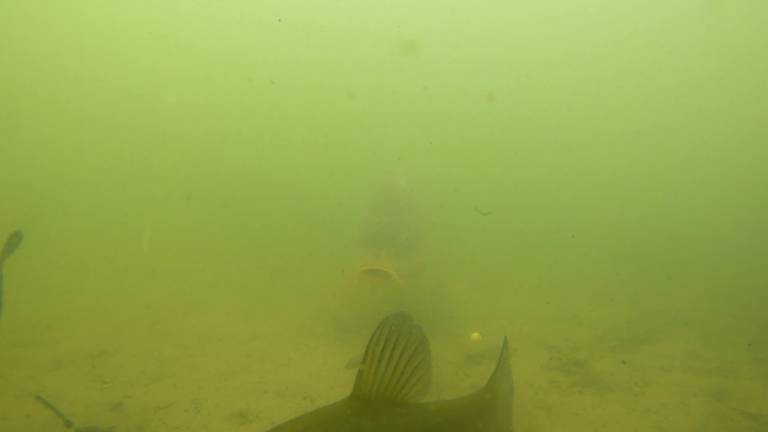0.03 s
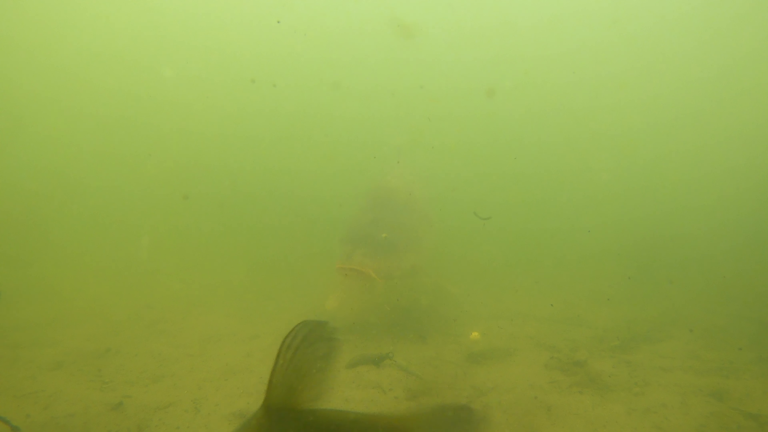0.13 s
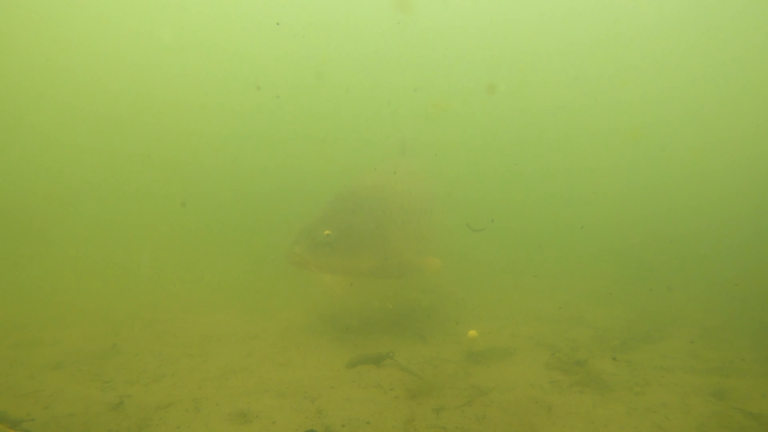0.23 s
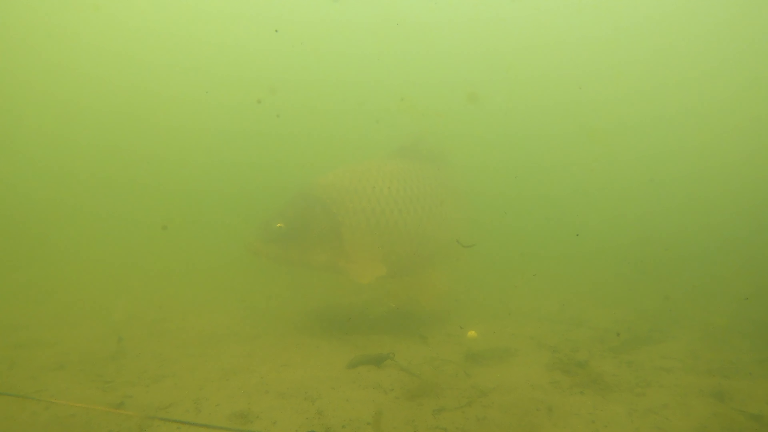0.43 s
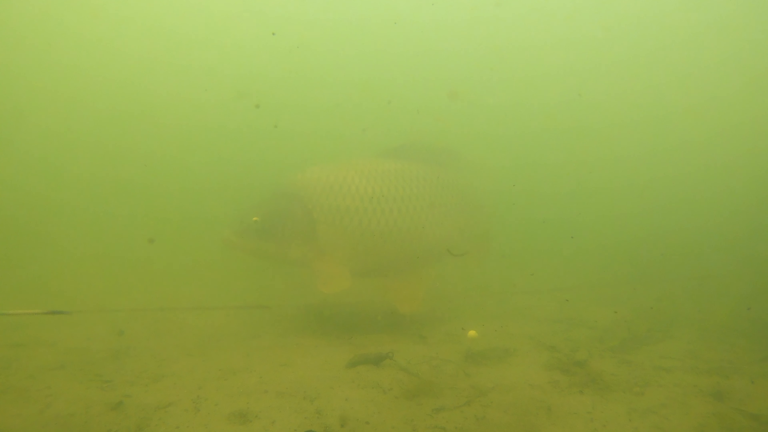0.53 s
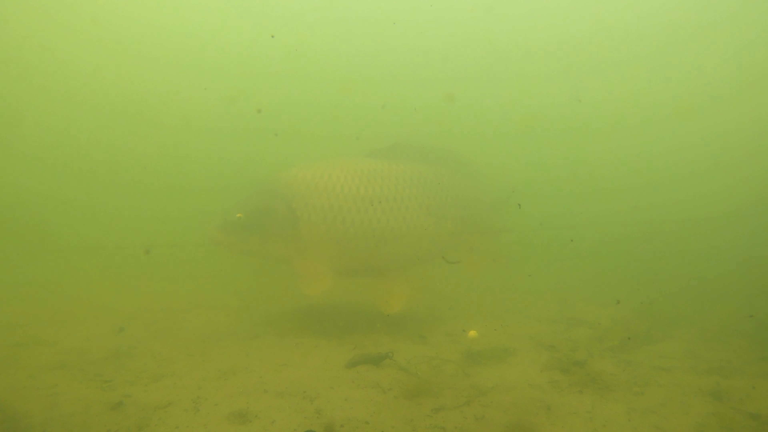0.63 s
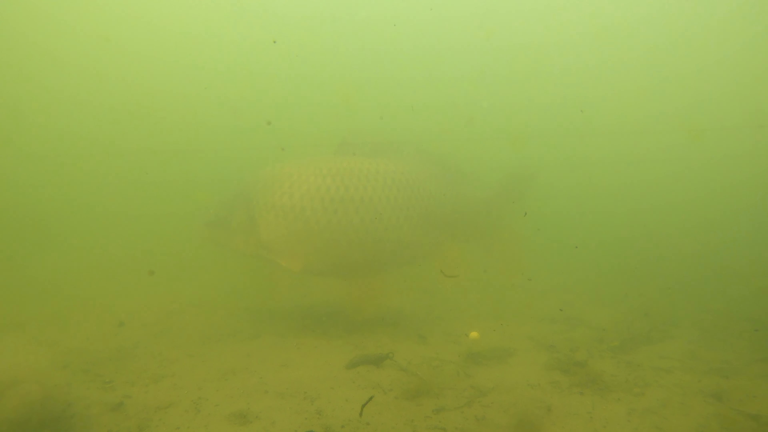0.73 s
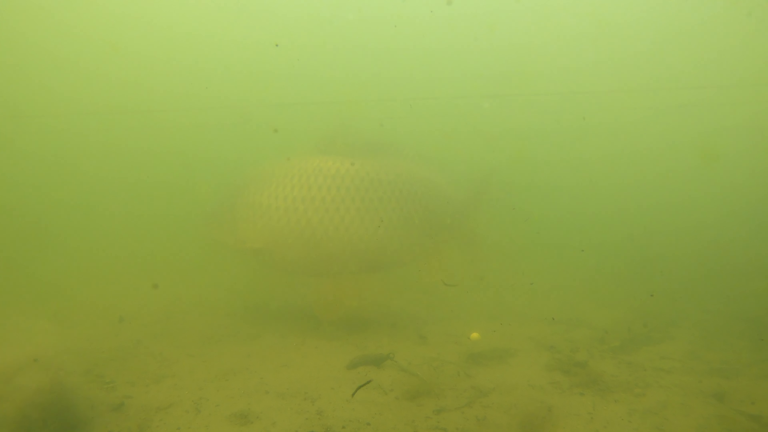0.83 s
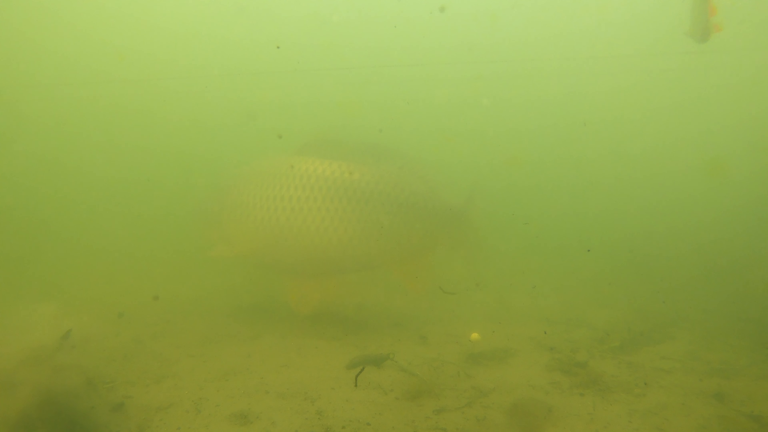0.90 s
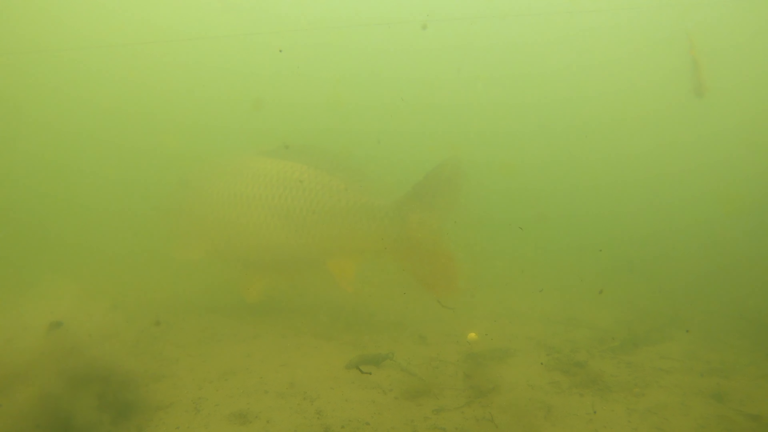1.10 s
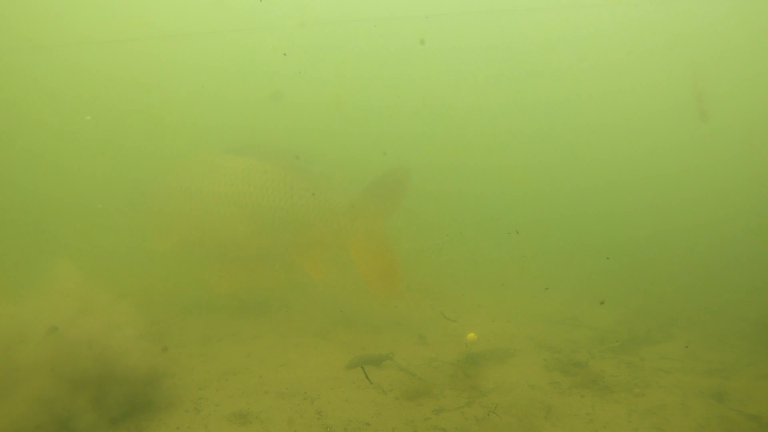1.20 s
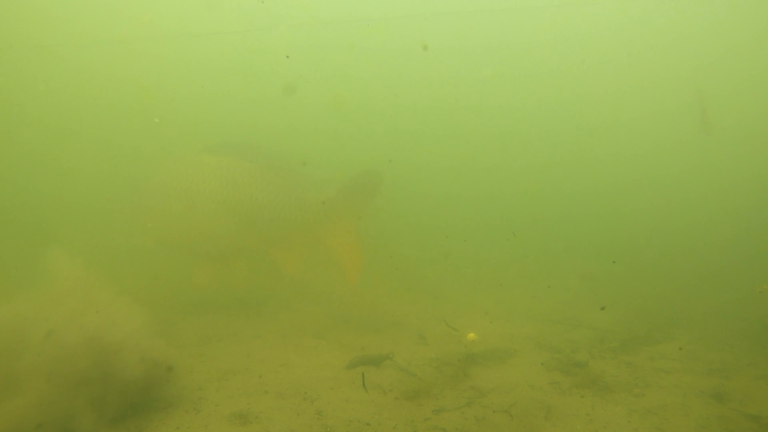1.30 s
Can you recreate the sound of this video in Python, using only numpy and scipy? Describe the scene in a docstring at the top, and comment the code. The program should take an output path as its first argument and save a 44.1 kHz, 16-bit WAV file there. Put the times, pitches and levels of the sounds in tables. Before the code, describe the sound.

A fish bumps an underwater camera, very close. From about 0.1 seconds, rubbing and soft knocks build over a low water rumble, peaking in one loud bump near 0.3 seconds that shakes the mount. A clicking scrape fades by 0.6 seconds. Faint silt ticks and a few small bubbles follow until about 1.3 seconds. A low electric hum runs underneath, dipping at the bump and creeping back.

```python
"""Rubbing, soft knocks, one loud bump and a fading scrape, over a low electric hum from the mains.
A fish is brushing past an underwater camera on a pond bed. Each touch makes the camera's case ring,
the water rumbles as it is pushed about, and the bump shakes the mount. Silt ticks on the case and
a few small bubbles ring. The bump makes the automatic volume control turn everything down,
and then the hum creeps back."""
import sys
import numpy as np
from scipy import signal
from scipy.fft import rfft, irfft, next_fast_len
from scipy.io import wavfile
from scipy.ndimage import uniform_filter1d, minimum_filter1d, map_coordinates

SR = 44100
rng = np.random.default_rng(int(sys.argv[2]) if len(sys.argv) > 2 else 0)


def to_wav(s):
    """Save 16-bit WAV."""
    ch = np.atleast_2d(s).T  # columns
    pcm = np.round(np.clip(ch, -1, 1) * 32767)  # PCM
    wavfile.write(sys.argv[1], SR, pcm.astype(np.int16))


N = 59535
TIME = np.arange(N) / SR
FFT_SIZE = next_fast_len(N + SR // 2)
SIDE = np.array([[1], [-1]])  # left, right


def amp(db):
    """Turn decibels into a multiplier."""
    return 10 ** (np.asarray(db) / 20)


def unit(x):
    """Scale a sound to an average power of 1."""
    return x / np.sqrt(np.mean(x ** 2) + 1e-20)


def along(points, hz):
    """Read a curve of (f/Hz, value) points on a log frequency axis."""
    f, value = np.transpose(points)
    return np.interp(np.log(hz + 1), np.log(f + 1), value)


def level(points):
    """Turn (t/s, level/dB) points into one multiplier per sample."""
    return amp(np.interp(TIME, *np.transpose(points)))


def filtered(x, response):
    """Multiply each frequency f in a sound by response(f)."""
    f = np.fft.rfftfreq(FFT_SIZE, 1 / SR)
    return irfft(rfft(x, FFT_SIZE) * response(f), FFT_SIZE)[..., :N]


def resonance(f, hz, width):
    """The response of something that rings at hz, with a peak of 1."""
    return 1j * f * width / (hz * hz - f * f + 1j * f * width)


def lowpass(f, hz, order):
    """A response that fades above hz, more steeply at a higher order."""
    b, a = signal.butter(order, 1, analog=True)
    return np.polyval(b, 1j * f / hz) / np.polyval(a, 1j * f / hz)


def case_response(contact):
    """The case rings briefly at several pitches; the kind of touch sets their mix."""
    # rings of the case: f/Hz, width/Hz, then level/dB for soft, scrape, hard and silt touches
    rings = [(613.7, 180, 9, -4, -4.5, -21), (761, 170, -1.5, -6.5, 11, -5.5),
             (1584, 233, -6.5, 5.5, 18, 5.5), (1808, 330, -44, -1.5, -12.5, -8),
             (2556, 270, -35, -4, 5.5, -5), (3070, 360, -36.5, -4, 1, -22),
             (4050, 580, -43.5, -18, -9.5, -21), (6040, 550, -59.5, -15.5, -17.5, -38),
             (8850, 1800, -59.5, -22.5, -14, -28)]
    # gaps between the rings: f/Hz, width/Hz, level/dB (the first is a small lift)
    gaps = [(334, 310, 3), (1280, 700, -15), (2137, 400, -17.5), (5035, 700, -9.5)]
    column = ["soft", "scrape", "hard", "silt"].index(contact)
    f = np.fft.rfftfreq(FFT_SIZE, 1 / SR)
    response = sum(amp(db[column]) * resonance(f, hz, width) ** 2 for hz, width, *db in rings)
    for hz, width, db in gaps:
        response *= 1 - (1 - amp(db)) * resonance(f, hz, width)
    return response


def blow(s, db, response, rattle):
    """One hit at time s chatters as it settles, differently in each microphone."""
    rattle_s = 0.0032
    start = round(s * SR)
    t = (np.arange(N) - start) / SR
    settling = (t >= 0) * np.exp(-np.abs(t) / rattle_s) / np.sqrt(rattle_s * SR / 2)
    chatter = rng.standard_normal((2, N)) * settling
    ring = filtered(signal.unit_impulse(N, start) + rattle * chatter, response)
    return amp(db) * ring / np.abs(ring).max(axis=1).mean()


def friction(contact, slips_per_s, stereo_width):
    """A surface catches and lets go, so clumps of tiny, uneven slips ring the case."""
    spread_db, clump_db, catches_per_s = 4, 3.5, 110
    slips = (rng.random((3, N)) < slips_per_s / SR) * rng.choice([-1, 1], (3, N))
    slips = slips * amp(spread_db * rng.standard_normal((3, N)))
    grip = map_coordinates(rng.uniform(-0.93, 1, N), [TIME * catches_per_s], mode="mirror")
    stereo = slips[0] + stereo_width * slips[1:]  # rows: shared, left, right
    return unit(filtered(amp(clump_db * grip) * stereo, lambda f: case_response(contact)))


def hum_and_noise():
    """Mains electricity hums steadily, a little to the left, over faint noise."""
    # tones of the hum: multiple of the mains frequency, level/dB
    tones = [(1, -36), (2, -67), (3, -45), (4, -71), (5, -65), (7, -68), (9, -75.5)]
    # tone colour of the noise: f/Hz, level/dB
    colour = [(20, -3), (90, 7), (200, -14.5), (400, -28.5), (1200, -21.5), (3500, -23), (5200, -37),
              (9000, -36.5), (12000, -41.5), (15000, -64.5)]
    mains_hz, pan_db, noise_db = 50, 2.5, -56
    hum = sum(amp(db) * np.sin(2 * np.pi * (k * mains_hz * TIME + rng.random())) for k, db in tones)
    noise = rng.standard_normal(N) + 0.84 * rng.standard_normal((2, N))
    noise = unit(filtered(noise, lambda f: amp(along(colour, f))))
    return hum * amp(pan_db * SIDE) + amp(noise_db) * noise


def ticks():
    """Fin rays and grit click on the case; the spot each one hits favours one ring."""
    # hard hits: t/s, level/dB, brightness/(dB per octave), ring f/Hz, ring level/dB
    hits = [(0.057, -36.5, 13, 8930, -38.5), (0.0571, -34.5, -2, 1835, -37.5),
            (0.109, -40.5, -6, 3200, -48.5), (0.146, -44, 4.5, 6360, -52), (0.2335, -49, 8.5, 6500, -45.5),
            (0.262, -21, 1, 4233, -37.5), (0.2625, -21.5, -8, 3080, -23), (0.2783, -17.5, -3, 981, -9),
            (0.3305, -26.5, -9.5, 1180, -34.5), (0.365, -33, -3, 1750, -34),
            (0.375, -26.5, 1.5, 1710, -28.5), (0.421, -28.5, 1, 6280, -23),
            (0.462, -28.5, -5.5, 1830, -34.5), (0.510, -37.5, 6, 8420, -58),
            (0.683, -32.5, -6.5, 4880, -53), (0.705, -40, -2, 4590, -47.5),
            (0.766, -52.5, -14, 1286, -46.5), (1.046, -43.5, 4, 2400, -44.5)]
    ring_sharpness = 4.5
    hard = case_response("hard")
    out = np.zeros((2, N))
    for s, db, bright, hz, ring_db in hits:
        out += blow(s, db, lambda f: hard * amp(bright * np.log2(np.clip(f, 500, 9000))), rattle=0.77)
        out += blow(s, ring_db, lambda f: resonance(f, hz, hz / ring_sharpness) ** 2, rattle=0.4)
    return out


def rubbing():
    """The fish's soft side slides along the case."""
    # strength of the rub: t/s, level/dB
    strength = [(0, -64), (.105, -78), (.128, -57.5), (.138, -46), (.166, -34), (.177, -58), (.195, -36.5),
                (.25, -39), (.284, -19.5), (.305, -26.5), (.34, -32.5), (.37, -48), (.51, -44.5),
                (.55, -52.5), (.58, -78)]
    return level(strength) * friction("soft", slips_per_s=2200, stereo_width=0.051)


def churn():
    """Water rumbles as the fish pushes it about."""
    # tone colour of the rumble: f/Hz, level/dB
    colour = [(20, -1), (45, 0), (130, -5.5), (200, -10.5), (300, -16), (400, -22.5), (700, -41),
              (3000, -89.5)]
    # surges of water: t/s, level/dB
    surges = [(.11, -83), (.145, -31), (.18, -44), (.235, -24.5), (.3, -34.5), (.345, -26), (.39, -49.5),
              (.47, -37.5), (.52, -43), (.59, -66.5), (.67, -55), (.98, -69.5), (1.05, -54), (1.11, -67)]
    return level(surges) * unit(filtered(rng.standard_normal(N), lambda f: amp(along(colour, f))))


def shudders():
    """The camera rocks on its mount in short, low bursts."""
    # shakes of the mount: t/s, length/s, f/Hz, level/dB
    shakes = [(0.131, 0.045, 105, -36.5), (0.226, 0.04, 64, -24.5), (0.2765, 0.041, 96.2, 7.5),
              (0.28, 0.069, 45.8, -8), (0.311, 0.071, 134, -10.5), (0.316, 0.12, 86.3, -13),
              (0.327, 0.068, 43.3, -7.5), (0.385, 0.1, 144, -27.5), (0.409, 0.067, 44.6, -9),
              (0.492, 0.055, 41.9, -21), (0.549, 0.063, 36.2, -32.5)]
    fade_share = 0.62  # part of each burst spent rising and falling
    out = np.zeros(N)
    for s, length, hz, db in shakes:
        t = TIME - s
        fade = np.clip(np.minimum(t, length - t) / (length * fade_share / 2), 0, 1)
        out += amp(db) * np.sin(np.pi / 2 * fade) ** 2 * np.sin(2 * np.pi * hz * t)
    return out


def knocks():
    """The fish nudges the case; its soft body stirs up little treble."""
    # soft hits: t/s, level/dB
    hits = [(0.134, -22.5), (0.1555, -30.5), (0.193, -25.5), (0.2167, -17), (0.2415, -18.5), (0.2667, -23),
            (0.2744, -9.5), (0.330, -23.5), (0.850, -53)]
    soft = case_response("soft")
    return sum(blow(s, db, lambda f: soft * lowpass(f, hz=2500, order=2), rattle=0.67) for s, db in hits)


def scraping():
    """A fin scrapes over the case, brighter than the rub."""
    # strength of the scrape: t/s, level/dB
    strength = [(0, -69.5), (.09, -69), (.2, -69), (.27, -46), (.3, -51.5), (.355, -47), (.376, -29.5),
                (.402, -35.5), (.411, -39), (.424, -35.5), (.465, -40), (.52, -48.5), (.56, -70),
                (.62, -106)]
    return level(strength) * friction("scrape", slips_per_s=2200, stereo_width=0.34)


def bubbles():
    """Each small bubble rings briefly at one pitch, with a soft start."""
    # bubble notes: t/s, f/Hz, level/dB
    notes = [(0.2593, 2849, -34), (0.379, 1598, -26.5), (0.397, 1654, -23.5), (0.694, 602, -46.5),
             (0.746, 767, -49), (0.760, 1600, -39.5), (0.772, 826, -49), (1.010, 785, -44.5),
             (1.045, 1488, -38), (1.052, 2430, -41), (1.228, 1545, -42), (1.25, 1610, -39.5),
             (1.252, 2630, -37), (1.265, 1753, -42.5), (1.264, 3400, -54.5)]
    rise_s = 0.00256
    out = np.zeros(N)
    for s, hz, db in notes:
        t = np.maximum(TIME - s, 0)
        swell = t / rise_s * np.exp(1 - t / rise_s)
        out += amp(db) * swell * np.sin(2 * np.pi * hz * t)
    return out


def bump():
    """The fish's side presses in: the case's lowest ring swells, then the body damps it."""
    peak_s, press_s, release_s = 0.2793, 0.0014, 0.0016
    ring_hz, level_db = 608.4, 10.5
    pan_db, left_lead_rad = 1.65, 0.58  # it lands near the middle
    t = TIME - peak_s
    pressure = np.where(t < 0, np.exp(-(t / press_s) ** 2 / 2), np.exp(-np.abs(t) / release_s))
    ring = np.cos(2 * np.pi * ring_hz * t + SIDE * left_lead_rad / 2)
    return amp(level_db + pan_db * SIDE) * pressure * ring


def silt():
    """Fine grains of drifting mud tick on the case."""
    # strength of the drift: t/s, level/dB
    strength = [(.55, -67.5), (.675, -63), (.69, -48.5), (.735, -64.5), (.77, -57), (.795, -59), (.97, -59),
                (1.02, -52), (1.055, -43.5), (1.09, -58), (1.15, -55.5), (1.21, -60), (1.27, -59),
                (1.32, -72)]
    return level(strength) * friction("silt", slips_per_s=1000, stereo_width=0.18)


def through_case(f):
    """The case passes little treble and reaches its two microphones slightly differently."""
    # how much louder the left is: f/Hz, level/dB
    balance = [(300, 6), (600, -2.5), (900, -7), (1600, -5.5), (3000, -2), (6000, -1), (10000, -2)]
    # how far the left wave runs ahead: f/Hz, phase/rad
    lead = [(200, -1.43), (600, -0.5), (1000, 2.2), (1600, 1.3), (3000, 1.35), (6000, 2.1), (10000, 0.76)]
    left_over_right = amp(along(balance, f)) * np.exp(1j * along(lead, f))
    return left_over_right ** (SIDE / 2) * lowpass(f, hz=9800, order=4)


def scene():
    """Add all the sounds into a left and a right channel."""
    small_sounds = rubbing() + scraping() + silt() + knocks() + ticks() + bubbles()
    return filtered(small_sounds, through_case) + bump() + shudders() + churn() + hum_and_noise()


def record(dry):
    """The volume drops just before a loud peak and creeps back; the highest treble is cut."""
    ceiling, recover_db_per_s, look_s, top_hz = 0.92, 7.5, 0.003, 15700
    window = round(look_s * SR)
    needed_db = -20 * np.log10(np.maximum(np.abs(dry).max(axis=0) / ceiling, 1))
    climb_db = recover_db_per_s * TIME
    gain_db = np.minimum.accumulate(minimum_filter1d(needed_db, window) - climb_db) + climb_db
    smooth_db = uniform_filter1d(uniform_filter1d(gain_db, window), window)
    return filtered(dry * amp(smooth_db), lambda f: f < top_hz)


dry = scene()
out = record(dry)
to_wav(out)
```